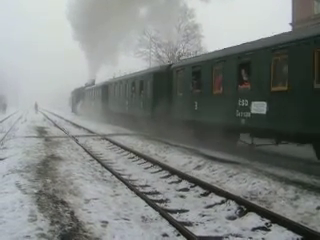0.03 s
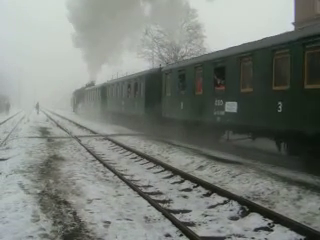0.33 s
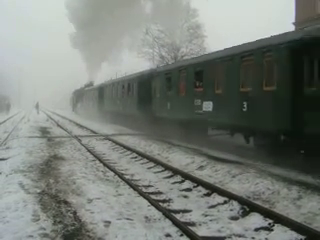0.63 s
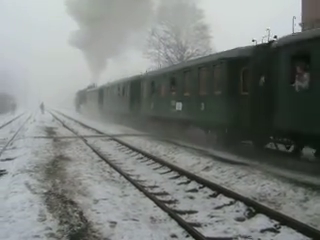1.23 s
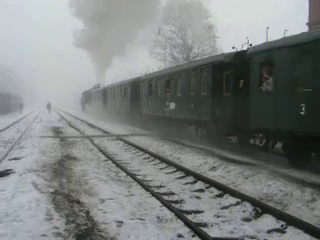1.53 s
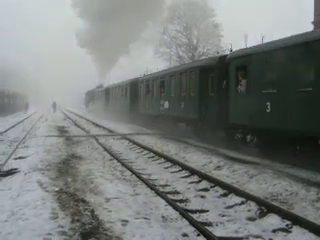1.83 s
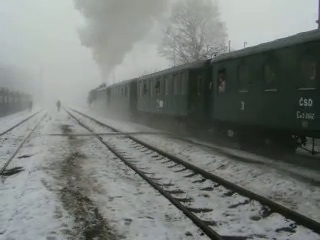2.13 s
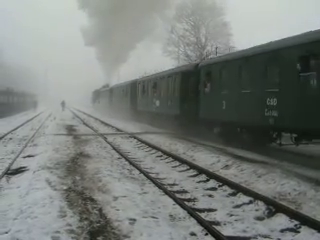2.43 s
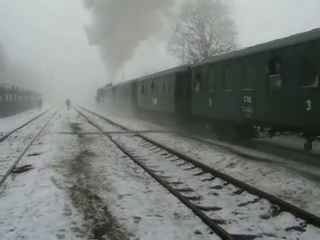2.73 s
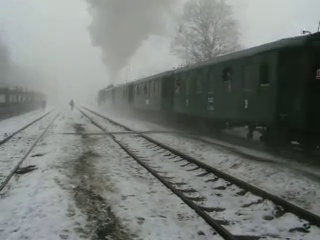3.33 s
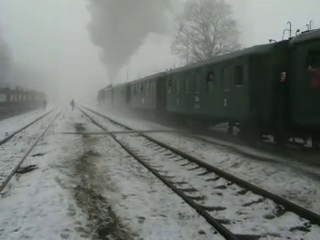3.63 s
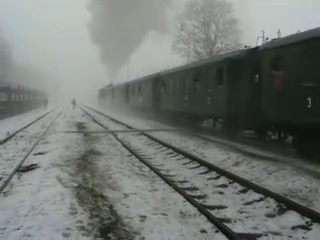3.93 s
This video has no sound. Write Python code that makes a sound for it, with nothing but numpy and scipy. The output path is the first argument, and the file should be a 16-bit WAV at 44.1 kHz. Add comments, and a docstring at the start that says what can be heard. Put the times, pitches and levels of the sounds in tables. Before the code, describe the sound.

Steady steam train chuffing and hissing, with carriage wheels rumbling, ringing and knocking nearby.

```python
"""A steam locomotive pulls away through fog while its carriages roll past close by. From the start, exhaust
beats, four or five a second, bark in the chimney and tear into a lingering hiss; steam rushes between them, and
wheels rumble, ring and knock. Near 1.7 s a flange briefly scrapes the rail. In the second half the carriage
bodies drum louder and the track bed booms. Throughout, the sound is narrow-band and the highest peaks of the
beats are rounded off."""
import sys
import numpy as np
from scipy import signal
from scipy.fft import rfft, irfft
from scipy.io import wavfile
from scipy.ndimage import uniform_filter1d

SR = 44100
rng = np.random.default_rng(int(sys.argv[2]) if len(sys.argv) > 2 else 0)


def dump_mix(stems):
    """Bounce the given channels to the path in sys.argv[1] as a 16-bit WAV at rate SR."""
    frames = np.atleast_2d(stems).T  # one column per channel
    limited = np.clip(frames, -1, 1)  # hard clip at full scale
    pcm = np.round(limited * 32767).astype(np.int16)
    wavfile.write(sys.argv[1], SR, pcm)


N = 176400  # 4 s


def undb(db):
    """Amplitude ratio of a level in decibels."""
    return 10 ** (np.asarray(db) / 20)


def curve(points):
    """Gain over time, interpolated between (time_s, level_db) points."""
    return undb(np.interp(np.arange(N) / SR, *np.array(points).T))


def colour(points):
    """Magnitude response through (frequency_hz, gain_db) points on a logarithmic frequency axis."""
    hz, db = np.array(points).T
    bins_hz = np.arange(N // 2 + 1) * SR / N + 1e-9
    return undb(np.interp(np.log(bins_hz), np.log(hz), db))


def resonances(modes):
    """Magnitude response of damped resonators whose powers add."""
    f = np.arange(N // 2 + 1) * SR / N + 1e-9
    power = sum(undb(db) ** 2 / (1 + ((f * f - hz * hz) / (f * width)) ** 2) for hz, width, db in modes)
    return np.sqrt(power)


def noise(spectrum):
    """Random-phase noise of unit rms with the given spectral shape."""
    phase = 2 * np.pi * rng.random(len(spectrum))
    wave = irfft(spectrum * np.exp(1j * phase), N)
    return wave / wave.std()


def flutter(rate_hz, depth_db):
    """Random amplitude modulation: smoothed noise moves the level by depth_db rms."""
    window = max(int(SR / rate_hz), 2)
    drift = uniform_filter1d(uniform_filter1d(rng.standard_normal(N), window), window)
    return undb(depth_db * drift / drift.std())


def burst(start_s, attack_s, hold_s, decay_s):
    """Envelope with a linear rise, decaying exponentially from hold_s after its start."""
    age = np.arange(N) / SR - start_s
    return np.clip(age / attack_s, 0, 1) * np.exp(-np.maximum(age - hold_s, 0) / decay_s)


# Track bed resonance: pitch_hz, width_hz, gain_db
BED_MODES = [(78, 45, 0)]
# Strength of the boom: time_s, level_db
BED_LEVELS = [(0, -46), (2.2, -46), (2.55, -33.5), (2.9, -39.5), (3.4, -38.5), (3.7, -33), (4, -36.5)]
def track_bed():
    """Forced vibration: the track bed booms under the rolling load."""
    return noise(resonances(BED_MODES) ** 2) * curve(BED_LEVELS)


# Carriage body resonances: pitch_hz, width_hz, gain_db
BODY_MODES = [(137, 18, -8), (159, 24, -1.5), (204, 24, 4), (338, 45, 1.5)]
# Strength of the drumming: time_s, level_db
BODY_LEVELS = [(0, -29.5), (.65, -25), (1.0, -29), (1.55, -28.5), (1.95, -23), (2.25, -27), (2.8, -23.5),
               (3.3, -21.5), (4, -21.5)]
def carriage_bodies():
    """Structure-borne sound: rolling vibration drums the low modes of the carriage bodies."""
    return noise(resonances(BODY_MODES)) * flutter(rate_hz=14, depth_db=0.93) * curve(BODY_LEVELS)


# Wheel resonances: pitch_hz, width_hz, gain_db
WHEEL_MODES = [(705, 74, -0.5), (795, 61, -1.5), (1290, 53, -10), (1552, 83, -6), (2908, 40, -9.5)]
# Strength of the ringing: time_s, level_db
WHEEL_LEVELS = [(0, -21.5), (.5, -24), (.9, -26.5), (1.6, -24), (2.25, -27.5), (2.7, -22.5), (3.05, -22.5),
                (3.5, -23.5), (4, -29.5)]
def wheel_ring():
    """Modal resonance: rough treads keep the wheels ringing hollowly."""
    return noise(resonances(WHEEL_MODES)) * flutter(rate_hz=9, depth_db=1.9) * curve(WHEEL_LEVELS)


# Rolling noise spectrum: frequency_hz, density_db
RUMBLE_SPECTRUM = [(20, -33), (38, -28), (52, -16.5), (70, -11), (100, -12), (150, 4), (260, 1), (430, -2),
                   (600, -2), (850, -1.5), (1100, -5), (2000, -5), (4000, -30.5)]
# Strength of the rumble: time_s, level_db
RUMBLE_LEVELS = [(0, -20), (.65, -20.5), (.87, -23), (1.35, -20), (1.55, -21), (2.0, -21), (2.25, -22),
                 (2.7, -21), (3.3, -18.5), (3.8, -18), (4, -18.5)]
def rumble():
    """Roughness excitation: treads rolling on the rail make broadband noise."""
    return noise(colour(RUMBLE_SPECTRUM)) * flutter(rate_hz=10, depth_db=1.3) * curve(RUMBLE_LEVELS)


# Wheel impacts: start_s, relative_level_db
IMPACTS = [(.205, -4), (0.611, -7.5), (1.335, 0.5), (1.385, -1.5), (2.03, 3), (2.541, -4), (2.733, 5),
           (3.144, 1.5), (3.294, -0.5), (3.574, -2.5), (3.81, -2)]
# Spectrum of an impact: frequency_hz, density_db
IMPACT_SPECTRUM = [(30, -23), (70, -6), (110, 0), (170, 0.5), (260, -1), (420, -2), (800, -5), (3000, -35)]
def wheel_knocks(level_db=-20):
    """Impact excitation: wheels strike uneven track in dull, quickly damped blows."""
    blows = sum(undb(db) * burst(start, attack_s=0.0065, hold_s=0.031, decay_s=0.034)
                for start, db in IMPACTS)
    return undb(level_db) * blows * noise(colour(IMPACT_SPECTRUM))


# Flange contacts: start_s, pitch_hz, level_db, hold_s
FLANGE_RUBS = [(1.644, 1803, -22.5, 0.064), (1.684, 1680, -22.5, .025), (1.728, 1575, -19.5, 0.043)]
def flange_scrapes(width_hz=80):
    """Friction excitation: a flange rubs the rail and the wheel sings hoarsely in a narrow band."""
    return sum(undb(db) * burst(start, attack_s=0.0088, hold_s=hold, decay_s=0.015)
               * noise(resonances([(hz, width_hz, 0)]) ** 2)
               for start, hz, db, hold in FLANGE_RUBS)


# Spectrum of rushing steam: frequency_hz, density_db
STEAM_SPECTRUM = [(400, -20), (800, -4.5), (1120, -7), (1380, -2.5), (1560, -2.5), (1830, -5.5), (2220, 2),
                  (2750, -1), (3000, 2), (3200, -2), (3700, -4.5), (4400, -11)]
# Strength of the rush: time_s, level_db
STEAM_LEVELS = [(0, -15.5), (.6, -19), (.88, -17.5), (1.3, -17), (1.82, -18.5), (2.0, -13.5), (2.27, -21),
                (2.75, -17), (3.55, -16), (4, -21.5)]
def steam():
    """Turbulent flow noise: steam rushes on between the beats."""
    return noise(colour(STEAM_SPECTRUM)) * curve(STEAM_LEVELS) * flutter(rate_hz=46, depth_db=1.2)


def surroundings(direct, echo_db=-7, delay_s=0.046, t60_s=0.43):
    """Reverberation: carriage sides, trees and buildings scatter the beats back."""
    tail = rng.standard_normal(N) * burst(delay_s, attack_s=0.0067, hold_s=0, decay_s=t60_s / np.log(1000))
    echo = signal.fftconvolve(direct, tail / np.linalg.norm(tail))[:N]
    return direct + undb(echo_db) * echo


# Exhaust beats: start_s, relative_bark_db, relative_hiss_db, valve_open_s
EXHAUST_BEATS = [(-.01, 1, -4, .045), (0.216, 2, 1, 0.059), (.453, -0.5, 1, 0.058),
                 (0.709, -3.5, 0.5, 0.037), (0.943, -1, -0.5, 0.059), (1.17, 1.5, 1.5, 0.044),
                 (1.404, -4.5, 2, 0.062), (1.636, -2.5, -1, 0.081), (1.868, 2, 2, 0.035),
                 (2.079, -2.5, 3.5, 0.065), (2.306, 2, 1, 0.062), (2.554, 4, 1.5, .05),
                 (2.768, 0.5, -2, 0.059), (2.961, 2.5, -2, 0.049), (3.192, 0.5, -2.5, 0.068),
                 (3.421, 1, -1.5, 0.046), (3.63, -1.5, 1, 0.07), (3.85, -1.5, 2, 0.045)]
# Chimney resonances: pitch_hz, width_hz, gain_db
CHIMNEY_MODES = [(188, 20, -0.5), (356, 59, -4), (515, 64, 0), (713, 69, 3), (805, 58, 2), (965, 150, -3),
                 (1360, 200, -6.5), (1570, 93, -2.5)]
# Steam jet spectrum: frequency_hz, density_db
JET_SPECTRUM = [(100, -23), (400, -8.5), (1130, -9.5), (1850, -3.5), (2280, 2), (2650, 1), (3000, 1),
                (3300, 0), (3700, -1.5), (4400, -5.5)]
def exhaust(bark_db=-17.5, hiss_db=-13, attack_s=0.015, hiss_lag_s=0.0055):
    """Pipe resonance and jet noise: each puff rings the chimney, then the ragged jet above it hisses."""
    bark_envelope = sum(undb(db) * burst(start, attack_s, hold, decay_s=0.028)
                        for start, db, _, hold in EXHAUST_BEATS)
    hiss_envelope = sum(undb(db) * burst(start + hiss_lag_s, attack_s, hold, decay_s=0.045)
                        for start, _, db, hold in EXHAUST_BEATS)
    bark = undb(bark_db) * bark_envelope * noise(resonances(CHIMNEY_MODES))
    hiss = undb(hiss_db) * hiss_envelope * noise(colour(JET_SPECTRUM))
    return (bark + hiss) * flutter(rate_hz=340, depth_db=1.5)  # fast flutter gives the tearing sound


def scene():
    """Superposition: locomotive and carriages add at one point beside the track."""
    locomotive = surroundings(exhaust()) + steam()
    rolling = rumble() + wheel_ring() + carriage_bodies() + track_bed()
    return (locomotive + rolling + wheel_knocks() + flange_scrapes())[None]


# Microphone response: frequency_hz, gain_db
MIC_RESPONSE = [(25, -11.5), (60, -2), (3200, 0), (3550, -2.5), (3800, -5.5), (4000, -10.5), (4200, -16),
                (4400, -27), (4650, -54), (5000, -87)]
def record(dry):
    """Band limiting and soft saturation: the treble falls away and the highest peaks are rounded."""
    dc_offset, knee, headroom, cutoff_hz = 0.032, 0.67, 0.08, 15800
    narrow = irfft(rfft(dry) * colour(MIC_RESPONSE), N) + dc_offset
    clipped = np.clip(narrow, -knee, knee)
    rounded = clipped + headroom * np.tanh((narrow - clipped) / headroom)
    lowpass = signal.ellip(8, 0.2, 70, cutoff_hz, fs=SR, output="sos")
    return signal.sosfilt(lowpass, rounded)


dry = scene()
out = record(dry)
dump_mix(out)
```